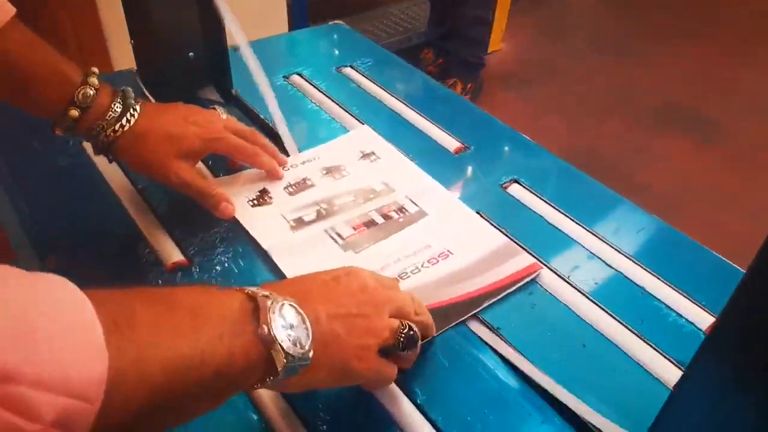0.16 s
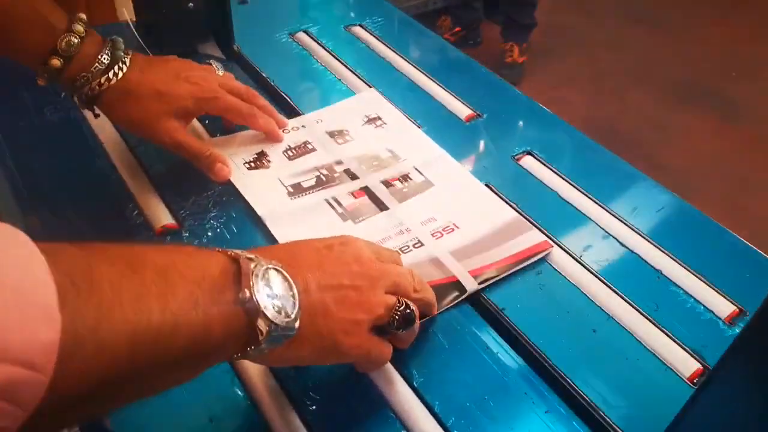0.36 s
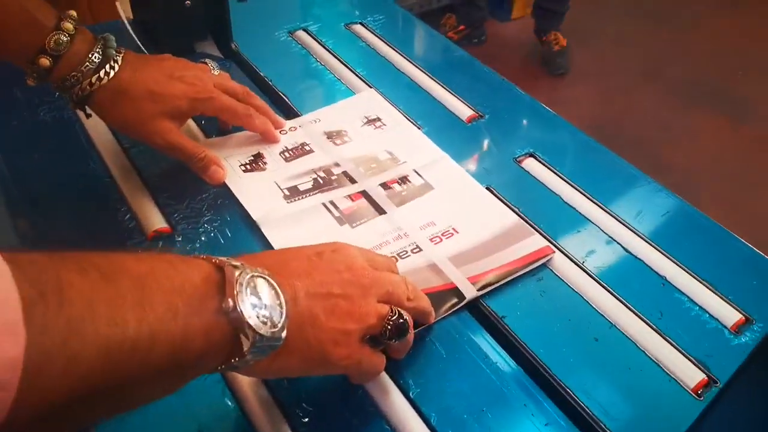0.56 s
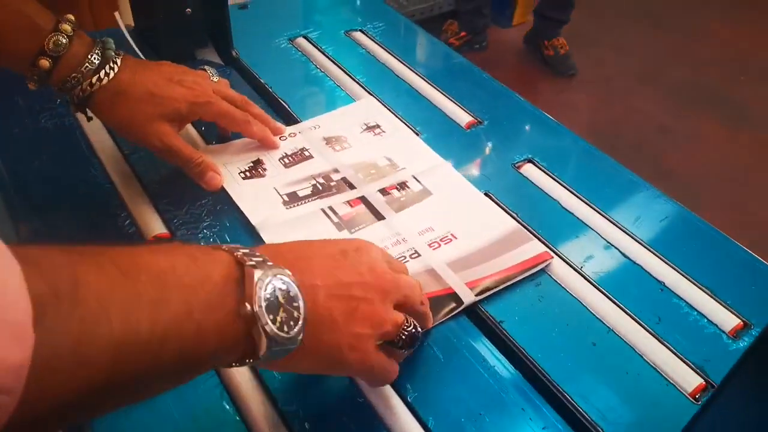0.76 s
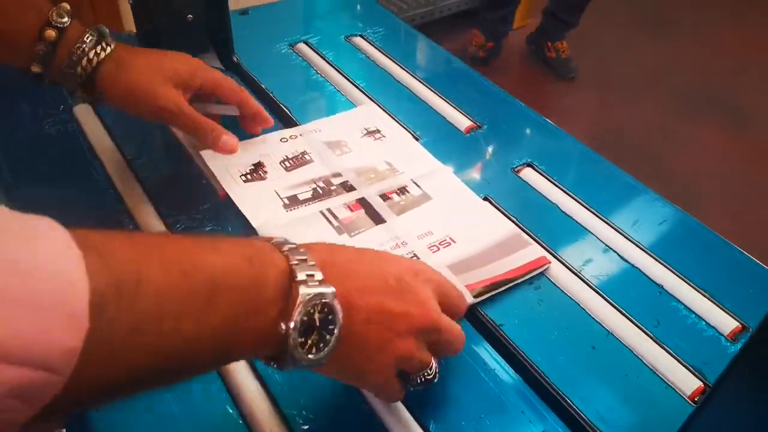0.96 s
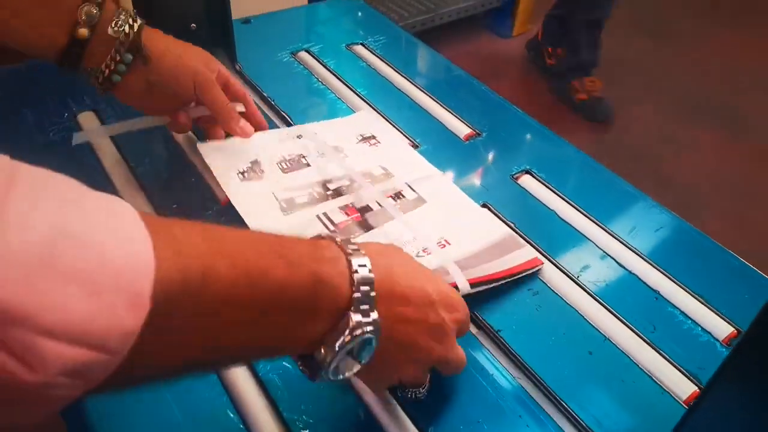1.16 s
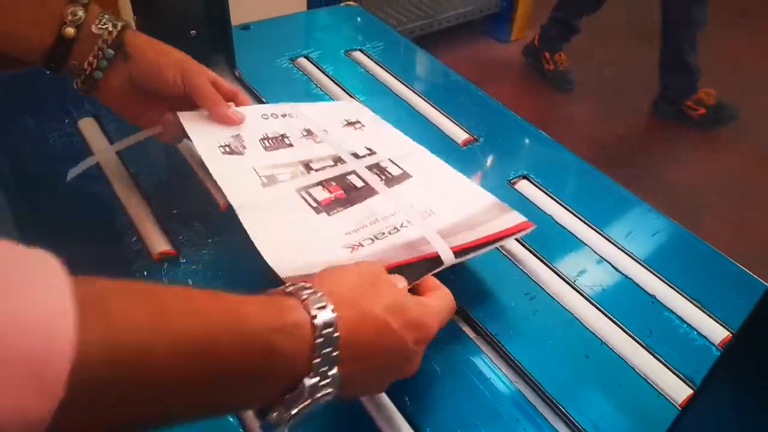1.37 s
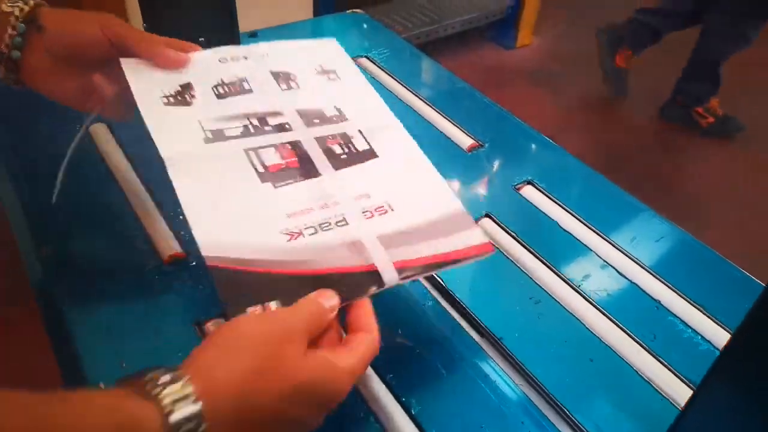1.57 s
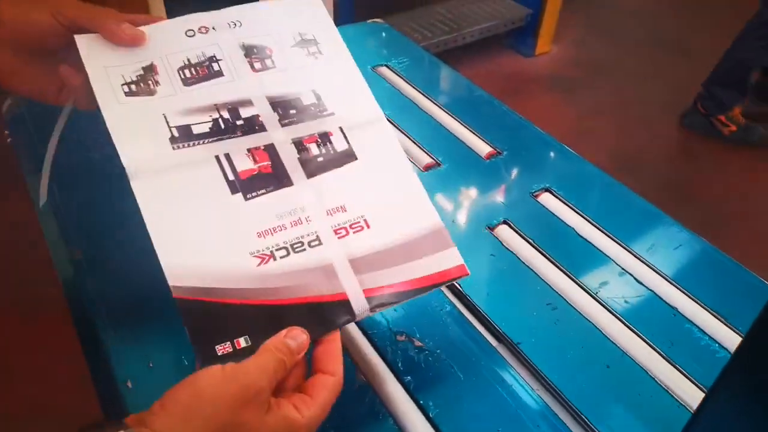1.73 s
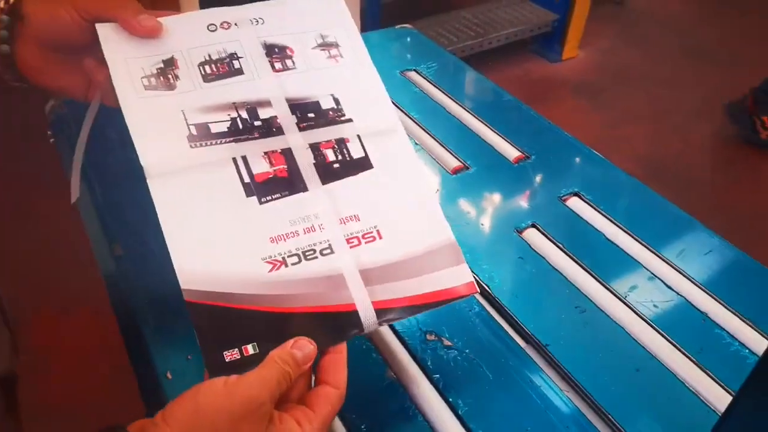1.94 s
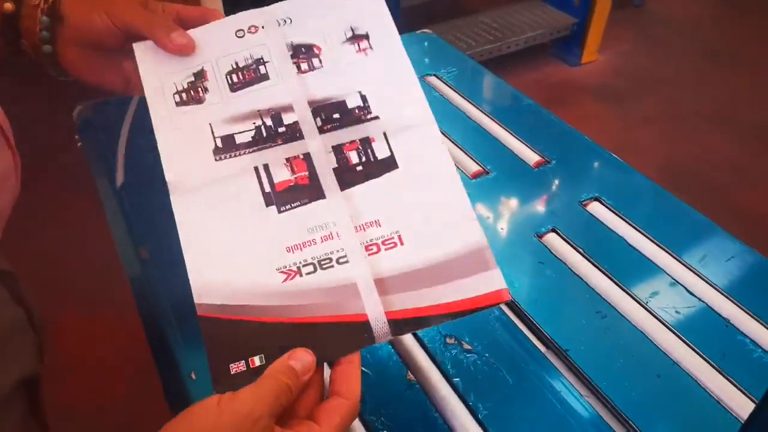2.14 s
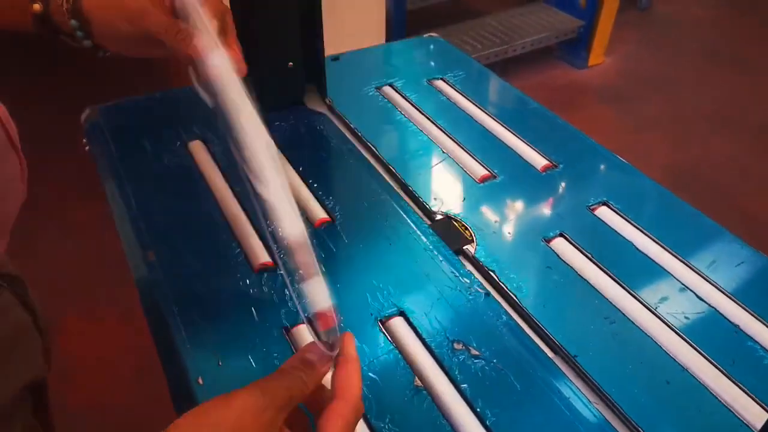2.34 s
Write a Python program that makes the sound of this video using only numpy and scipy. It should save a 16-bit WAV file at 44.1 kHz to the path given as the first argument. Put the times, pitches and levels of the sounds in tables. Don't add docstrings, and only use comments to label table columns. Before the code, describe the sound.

A strapping machine runs one cycle: metal clacks, two short motor whirs, a click stop, workshop ringing.

```python
import sys
import numpy as np
from scipy import signal
from scipy.fft import rfft, irfft
from scipy.io import wavfile
from scipy.ndimage import uniform_filter1d

SR = 44100
rng = np.random.default_rng(int(sys.argv[2]) if len(sys.argv) > 2 else 0)


def put_to_file(sound):
    columns = np.atleast_2d(sound).T
    safe = np.clip(columns, -1, 1)
    whole_steps = np.round(safe * 32767)
    wavfile.write(sys.argv[1], SR, whole_steps.astype(np.int16))


def decibels_to_gain(level_db):
    exponent = np.asarray(level_db, float) / 20
    return 10 ** exponent


N = 110250

# frequency in Hz, level in dB.
STEEL_WIDE = [(600, -10), (1500, -6.5), (3000, -8), (4000, -9.5), (7500, -6), (9000, -15.5), (11000, -61),
              (15500, -45)]
# frequency in Hz, width in Hz, level in dB.
FRAME_NOTES = [(119.3, 34, -22.5), (169.4, 20, 2.5), (398, 13.3, -20), (599, 45, 5), (820, 135, -10),
               (904, 42, 1.5), (1086, 60, -17.5), (1346, 71, -3.5), (1477, 360, -37), (2430, 327, -3)]
# frequency in Hz, level in dB.
FRAME_WIDE = [(30, -22.5), (100, 1.5), (200, 5), (600, -6), (1500, -7), (3000, -7.5), (5000, -75)]


def evened(x):
    return x / np.sqrt(np.mean(x ** 2) + 1e-20)


def read(points, hz):
    f, value = np.transpose(points)
    return np.interp(np.log(hz + 1), np.log(f + 1), value)


def curve(points):
    s, db = np.transpose(points)
    s, db = np.append(s, s[-1] + 0.1), np.append(db, -120)
    return decibels_to_gain(np.interp(np.arange(N) / SR, s, db, left=-120))


def colour(x, points):
    gain = decibels_to_gain(read(points, np.fft.rfftfreq(x.shape[-1], 1 / SR)))
    return irfft(rfft(x) * gain, x.shape[-1])


def resonate(x, hz, width):
    r = np.exp(-np.pi * width / SR)
    if np.ndim(hz) == 0:
        return 2 * signal.lfilter([1 - r], [1, -r * np.exp(2j * np.pi * hz / SR)], x).real
    turn = np.exp(2j * np.pi * np.cumsum(hz) / SR)
    return 2 * (turn * signal.lfilter([1 - r], [1, -r], x / turn)).real


def body(x, peaks, wide, wide_db, stretch=1):
    rings = 0
    for k, (hz, width, db) in enumerate(peaks):
        rings = rings + (-1) ** k * decibels_to_gain(db) * resonate(x, hz * stretch, width)
    return evened(rings) + decibels_to_gain(wide_db) * evened(colour(x, wide))


def pair(a, b):
    # frequency in Hz, likeness from 0 to 1.
    likeness = [(60, 1), (200, 0.75), (500, 1), (1000, 0.083), (4000, 0.058)]
    size = len(a) + SR // 10
    same = np.clip(read(likeness, np.fft.rfftfreq(size, 1 / SR)), 0, 1)
    other = same * rfft(a, size) + np.sqrt(1 - same ** 2) * rfft(b, size)
    return np.array([a, irfft(other, size)[:len(a)]])


def floor_noise():
    # frequency in Hz, level in dB.
    floor_colour = [(18, -55), (30, -10.5), (55, -5.5), (132, -11), (169, -3), (187, 1.5), (407, -17.5),
                    (3880, -49.5), (12000, -43.5), (15600, -51), (22000, -120)]
    noise = pair(*rng.standard_normal((2, N)))
    return decibels_to_gain(-65) * evened(colour(noise, floor_colour))


def drive():
    # start in seconds, effort in dB, side panel buzz over it in dB.
    effort = [(0.0, -54, -13), (.2, -49, -7), (.5, -52, -22), (.7, -50.5, -19.5), (.9, -50, -7),
              (.97, -68.5, -8), (1.02, -63, 5), (1.1, -55.5, -5), (1.3, -44, -9), (1.4, -62.5, -7),
              (1.7, -66, 2)]
    # frequency in Hz, level in dB.
    shake_colour = [(250, -7), (600, -12.5), (4000, -27.5)]
    # frequency in Hz, level in dB.
    slide_colour = [(290, -23.5), (500, -44), (815, -1), (1090, 1.5), (1560, 4.5), (1800, -3), (2040, 6),
                    (5670, -7), (15500, -31.5)]
    # start in seconds, level in dB.
    slide_level = [(0, -44.5), (.1, -50.5), (.17, -50), (.3, -63)]
    # start in seconds,
    # pitch in Hz, level in dB.
    hums = [
        [(.02, 660, -60), (.07, 730, -52), (.12, 860, -48), (.2, 960, -54)],
        [(0, 2040, -52), (.08, 2045, -57), (.17, 2050, -61)],
        [(1.27, 3960, -70), (1.305, 3880, -41), (1.34, 3800, -44), (1.36, 3780, -60)],
    ]
    panel_hz, panel_width = 276, 18

    frame_noise, slide_noise, panel_noise, hum_noise = rng.standard_normal((4, N))
    shake = evened(colour(body(frame_noise, FRAME_NOTES, FRAME_WIDE, -0.76), shake_colour))
    shake = shake * curve([(s, db) for s, db, _ in effort])
    panel = resonate(resonate(panel_noise, panel_hz, panel_width), panel_hz, 33)
    panel = evened(panel) * curve([(s, db + buzz_db + 1.5) for s, db, buzz_db in effort])
    out = shake + panel + evened(colour(slide_noise, slide_colour)) * curve(slide_level)
    for hum in hums:
        s, hz, db = np.transpose(hum)
        pitch = np.interp(np.arange(N) / SR, s, hz)
        out += evened(resonate(hum_noise, pitch, 52)) * curve(list(zip(s, db)))
    return out


def booms():
    # start in seconds, length in seconds, pitch in Hz, level in dB.
    panel_booms = [(.05, .12, 172, -53), (.29, .09, 176, -52), (.3, .12, 278, -45.5), (.43, .06, 172, -47),
                   (0.7, 0.099, 182, -47), (0.76, 0.051, 140, -49.5), (.74, 0.32, 178, -53.5),
                   (.63, 0.066, 520, -53.5), (0.69, .1, 622, -47.5), (.25, .06, 480, -43.5),
                   (.16, .08, 600, -45), (1.07, .13, 178, -49.5), (1.12, 0.12, 270, -46.5),
                   (1.29, .085, 278, -44.5), (1.1, .06, 400, -51), (1.22, .12, 200, -52),
                   (.8, .1, 255, -47), (0.81, .03, 1300, -41.5), (1.027, 0.025, 1350, -39.5),
                   (1.075, .025, 2300, -40.5)]
    roughness = 0.8
    out = np.zeros(N)
    for s, length, hz, db in panel_booms:
        t = np.arange(0, length, 1 / SR)
        tone = np.sqrt(2) * np.sin(2 * np.pi * (hz * t + rng.random()))
        rough = resonate(rng.standard_normal(SR // 2), hz, 0.23 * hz)[-len(t):]
        note = tone + roughness * evened(rough)
        swell = np.sqrt(abs(np.sin(np.pi * (t / length) ** 0.52)))
        out[round(s * SR):][:len(t)] += decibels_to_gain(db) * swell * evened(note)
    return out


def clacks():
    # start in seconds, steel level in dB, frame level in dB,
    # rattle time to fall 60 dB in seconds, ring pitch in Hz.
    strikes = [(0.1809, -21, -37, 0.06, 4600), (0.2372, -15, -33, 0.027, 5650),
               (0.2572, -22, -31, 0.12, 4470), (0.2848, -16.5, -34, 0.12, 5970),
               (0.4608, -19, -47, 0.034, 4150), (0.611, -31, -38.5, 0.22, 4520),
               (0.6944, -30, -37.5, 0.13, 4400), (0.7378, -29.5, -31.5, 0.18, 3910),
               (0.808, -44, -43.5, 0.024, 2503), (1.01, -39, -61.5, 0.044, 4100),
               (1.0222, -30, -32, 0.056, 2620), (1.051, -23, -37, 0.046, 4900),
               (1.0695, -22.5, -31.5, 0.12, 3940), (1.0809, -25.5, -30.5, 0.092, 5300),
               (1.1206, -14.5, -27.5, 0.12, 4970), (1.2431, -18, -34.5, 0.06, 3960),
               (1.2756, -18, -28.5, 0.054, 4160), (1.3353, -17.5, -34, 0.027, 3830),
               (1.548, -14, -39.5, 0.035, 4470), (1.5885, -7, -33, 0.019, 3620)]
    # frequency in Hz, width in Hz, level in dB.
    steel_notes = [(3860, 250, 7.5), (4970, 50, 14.5), (5320, 300, 7.5), (8040, 43, -18.5), (3550, 550, -5)]
    ring_width, ring_db = 350, -2.5
    rise = 0.055
    out, t = np.zeros(N), np.arange(SR // 4) / SR
    for s, steel_db, frame_db, t60, ring_hz in strikes:
        steel_noise, frame_noise, impacts = rng.standard_normal((3, len(t)))
        stretch = rng.uniform(1.0, 1.05)
        grit = steel_noise * decibels_to_gain(2.5 * evened(uniform_filter1d(impacts, size=60)))
        steel = body(grit, steel_notes, STEEL_WIDE, -0.4, stretch)
        steel = steel + decibels_to_gain(ring_db) * evened(resonate(grit, ring_hz, ring_width))
        steel = steel * np.minimum(t / (rise * t60), 1) * decibels_to_gain(-60 * t / t60 - 13.0)

        frame = body(frame_noise, FRAME_NOTES, FRAME_WIDE, -0.28)
        frame = frame * np.minimum(t / 0.0025, 1) * decibels_to_gain(-60 * t / (1.49 * t60 + 0.18) - 5.5)
        frame = colour(frame, [(200, -20), (550, 1.0), (1400, 9.0), (3000, -3.5)])
        out[round(s * SR):][:len(t)] += decibels_to_gain(steel_db) * steel + decibels_to_gain(frame_db) * frame
    return out


def snaps():
    # start in seconds, level in dB, ring pitch in Hz, time to fall 60 dB in seconds.
    contacts = [(0.237, -38, 5460, 0.0082), (0.2903, -32, 3750, 0.0058), (0.464, -25, 4170, 0.0056),
                (0.739, -30, 2630, .02), (1.0507, -20.5, 5530, 0.005), (1.081, -24, 5220, 0.02),
                (1.1215, -22.5, 4150, .02), (1.1258, -18, 4850, .015), (1.1272, -25, 4040, .02),
                (1.1319, -17, 4120, 0.01), (1.14, -21, 3830, 0.012), (1.5472, -13.5, 4800, 0.0053),
                (1.5895, -18.5, 4150, .008), (1.5912, -16, 3724, 0.0084), (1.5935, -19.5, 3940, 0.0081)]
    rise_s, edge_db = 0.0006, -9.5
    out, t = np.zeros(N), np.arange(SR // 20) / SR
    for s, db, hz, t60 in contacts:
        edge = decibels_to_gain(edge_db) * evened(colour(rng.standard_normal(len(t)), STEEL_WIDE))
        ring = np.sin(2 * np.pi * hz * t)
        fade = decibels_to_gain(db - 60 * t / t60) * np.minimum(t / rise_s, 1)
        out[round(s * SR):][:len(t)] += fade * (ring + edge)
    return out


def motor():
    # time in seconds, rate of teeth meeting in Hz, whine level in dB.
    runs = [
        [(.26, 1700, -62), (.29, 1890, -47), (.328, 1940, -44), (.35, 2020, -30), (.38, 2075, -38),
         (.412, 2095, -31), (.438, 2120, -37), (.466, 2155, -33), (.49, 2150, -48)],
        [(1.28, 900, -48), (1.33, 1370, -39), (1.358, 1750, -30), (1.392, 1910, -27), (1.435, 2025, -28),
         (1.48, 2090, -34), (1.53, 2185, -30), (1.552, 1980, -38), (1.59, 2070, -34)],
    ]
    low_tone_db = [-8, 4.5]
    # multiple of the tooth rate, tone level in dB, fuzz level in dB.
    gear_tones = [(1, -17, -21), (2, 0.1, -9), (3, -40, -27), (4, -26, -14)]
    # frequency in Hz, level in dB.
    brush_colour = [(1500, -28), (3300, 3), (5500, 0), (8300, -4.5), (10000, -15.5), (15000, -6)]
    # frequency in Hz, level in dB.
    casing = [(2000, -3.2), (2900, 0), (3250, -5.5), (3600, -1.45), (8000, 0.3)]
    wobble = 0.009
    throb_hz, throb_width, throb_depth = 66, 14, 0.6
    fuzz_hz, brush_db, grit_db = 90, -8.5, 0.5
    brush_steady = 0.74

    out = np.zeros(N)
    for run, low_db in zip(runs, low_tone_db):
        s, mesh_hz, db = np.transpose(run)
        t = np.arange(s[0], s[-1] + 0.013, 1 / SR)
        hz = np.interp(t, s, mesh_hz)
        shaft_noise, grit_noise, flutter_noise, brush_noise = rng.standard_normal((4, len(t)))
        flutter = evened(uniform_filter1d(flutter_noise, size=160))
        turns = 2 * np.pi * np.cumsum(hz * (1 + wobble * flutter)) / SR
        shaft = resonate(resonate(shaft_noise, throb_hz, throb_width), throb_hz, 3 * throb_width)
        throb = 1 + throb_depth * evened(shaft)
        grit = decibels_to_gain(grit_db * evened(uniform_filter1d(grit_noise, size=90)))

        swing_db = np.interp(t, s, np.maximum(db, -38) + 31)
        hiss = evened(colour(brush_noise * grit, brush_colour))
        sound = decibels_to_gain(brush_db - brush_steady * swing_db) * hiss
        for k, tone_db, fuzz_db in gear_tones:
            fuzz = resonate(rng.standard_normal(len(t)) * grit, k * hz, k * fuzz_hz)
            fuzz = evened(resonate(fuzz, k * hz, 2 * k * fuzz_hz))
            tone = decibels_to_gain(tone_db) * throb * np.cos(k * turns) + decibels_to_gain(fuzz_db) * fuzz
            sound += decibels_to_gain(low_db * (k == 1)) * tone
        braking = np.clip((t[-1] - t) / 0.032, 0, 1)
        out[round(s[0] * SR):][:len(t)] += sound * decibels_to_gain(np.interp(t, s, db)) * braking
    return colour(out, casing)


def thumps():
    # start in seconds, level in dB, pitch in Hz.
    pushes = [
        (1.545, -37, 45),
        (1.588, -35, 36),
    ]
    tick_db, tick_t60 = 2, 0.02
    out, t = np.zeros((2, N)), np.arange(SR // 5) / SR
    for s, db, hz in pushes:
        tick = evened(colour(rng.standard_normal((2, len(t))), STEEL_WIDE))
        tick = tick * decibels_to_gain(tick_db - 60 * abs(t - 0.002) / tick_t60)
        push = decibels_to_gain([[3], [-6]]) * decibels_to_gain(-60 * t / 0.055) * np.sin(2 * np.pi * hz * t)
        out[:, round(s * SR):][:, :len(t)] += decibels_to_gain(db) * (push + tick)
    return out


def echoes(x, t60_of, start_s):
    taps = np.zeros((2, 2 * SR))
    at = np.arange(0, 2 * SR, 20) + rng.integers(0, 20, (2, SR // 10))
    np.put_along_axis(taps, at, rng.choice([-1., 1.], at.shape), 1)
    hz, t, z = signal.stft(pair(*taps), SR, nperseg=128)
    fade = decibels_to_gain(-60 * t / t60_of(hz)[:, None]) * np.clip(t / start_s + 0.32, 0, 1)
    tail = signal.istft(z * fade, SR, nperseg=128)[1]
    return signal.fftconvolve(x[None], tail / np.linalg.norm(tail[0]), axes=1)[:, :N]


def workshop(x):
    # frequency in Hz, time to fall 60 dB in seconds.
    hall_times = [(100, 0.47), (300, 3.15), (1000, 1.94), (3000, 1.97), (4200, 1.39), (5500, 1.32),
                  (9000, 0.97)]
    # frequency in Hz, level in dB.
    hall_colour = [(600, -0.5), (1500, 2.04), (3200, 2), (4100, -4.5), (5000, 1)]
    near = echoes(x, lambda hz: 0.15 + 0 * hz, 0.0075)
    hall = echoes(colour(x, hall_colour), lambda hz: read(hall_times, hz), 0.035)
    return decibels_to_gain(-3.5) * near + decibels_to_gain(-9.5) * hall


def scene():
    moving_parts = pair(drive() + clacks(), drive() + clacks())
    machine = moving_parts + booms() + snaps() + motor()
    return floor_noise() + decibels_to_gain(0.5) * machine + workshop(machine[1]) + thumps()


def roll_off(x):
    return signal.sosfilt(signal.butter(12, 15620, fs=SR, output="sos"), x)


def record(dry):
    # frequency in Hz, difference in dB.
    left_over_right = [(30, 0), (130, -3), (500, -6.5), (1300, -1), (2400, -7), (4200, -12.5), (6500, -2.5),
                       (9000, 12), (15000, -2.5)]
    # frequency in Hz, level in dB.
    mic_colour = [(7500, 0.69), (8800, -6), (9600, -5.5), (15000, -10)]
    size = N + SR // 10
    hz = np.fft.rfftfreq(size, 1 / SR)
    half = decibels_to_gain(read(left_over_right, hz) / 2)
    top_edge = 1 / (1 + (hz / 15150) ** 60)
    ports = rfft(dry, size) * np.array([half, 1 / half]) * decibels_to_gain(read(mic_colour, hz)) * top_edge
    return roll_off(irfft(ports, size)[:, :N])


dry = scene()
out = record(dry)
put_to_file(out)
```